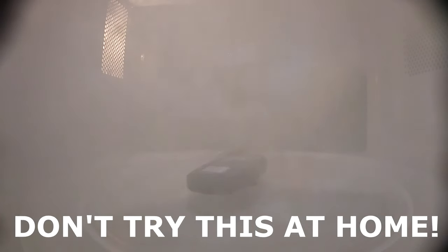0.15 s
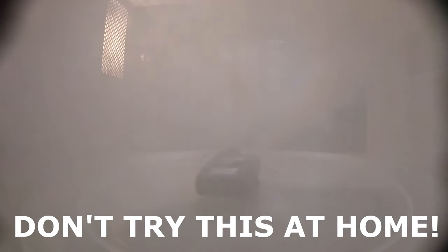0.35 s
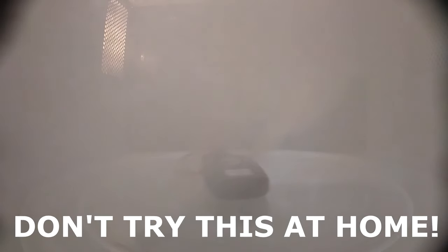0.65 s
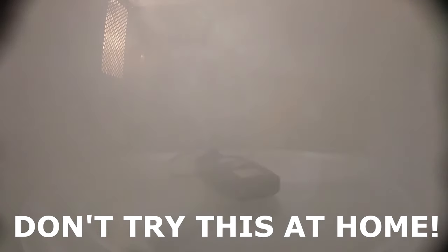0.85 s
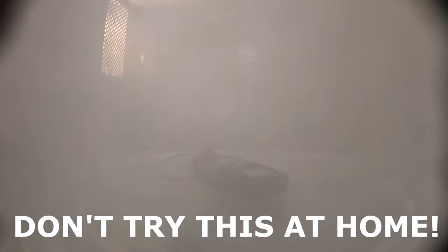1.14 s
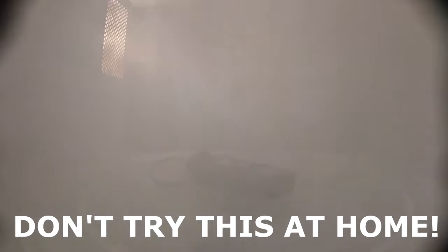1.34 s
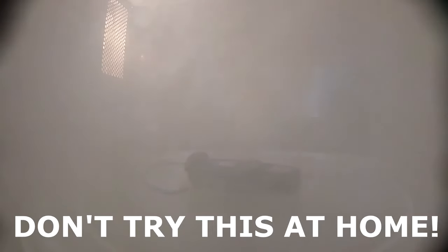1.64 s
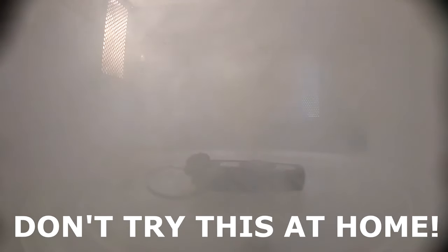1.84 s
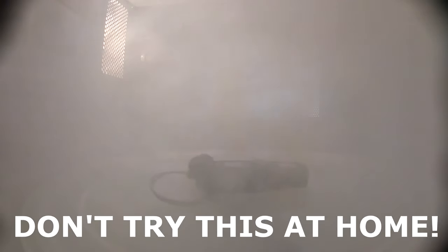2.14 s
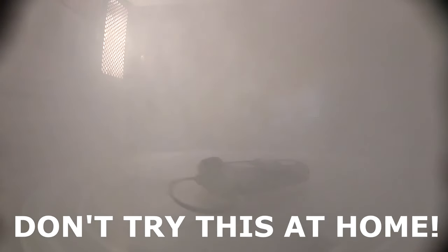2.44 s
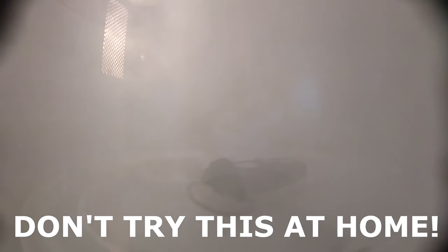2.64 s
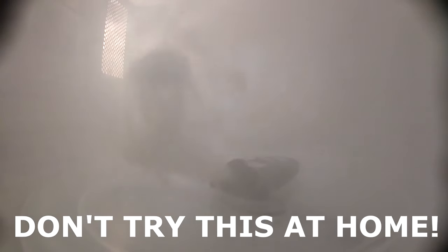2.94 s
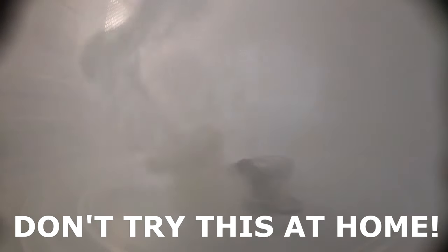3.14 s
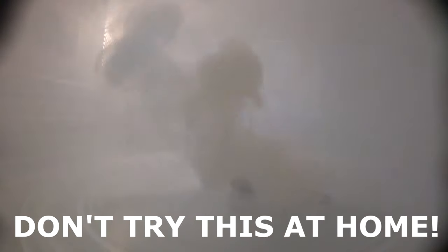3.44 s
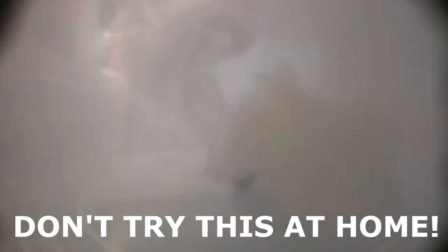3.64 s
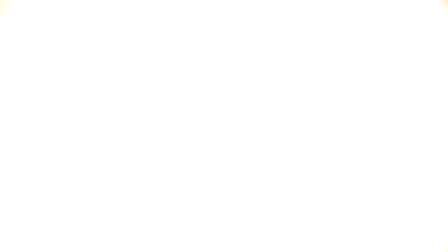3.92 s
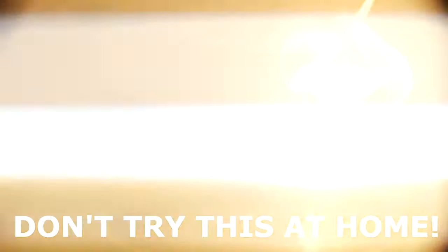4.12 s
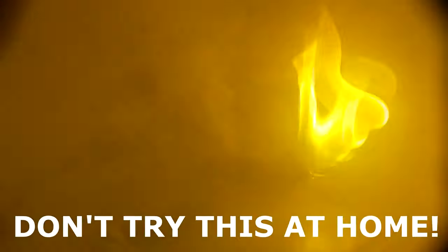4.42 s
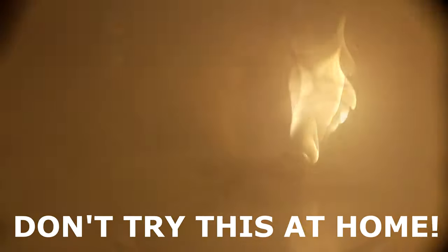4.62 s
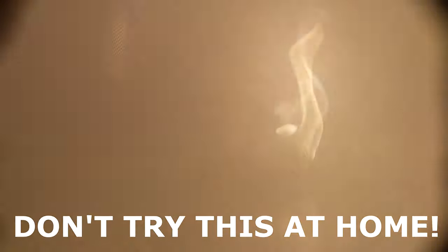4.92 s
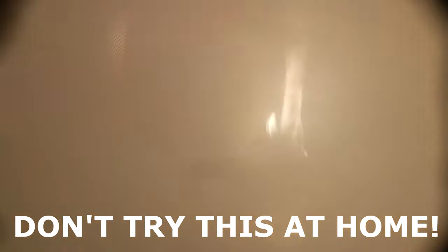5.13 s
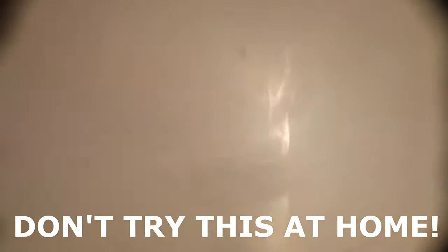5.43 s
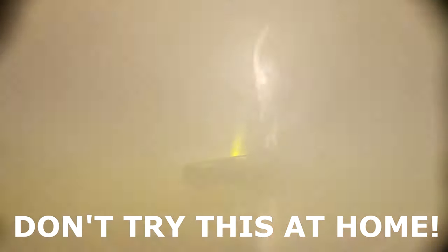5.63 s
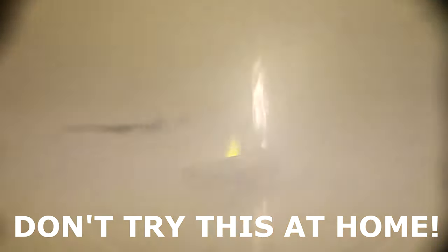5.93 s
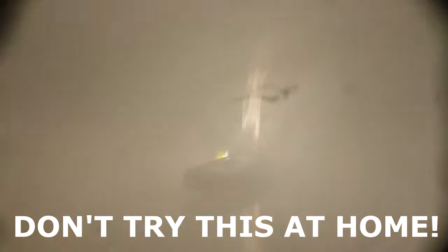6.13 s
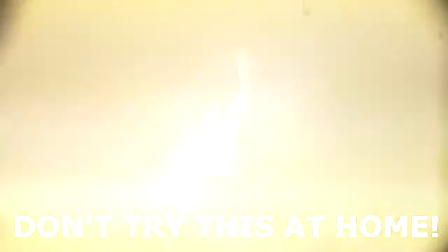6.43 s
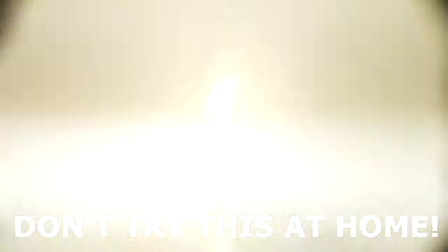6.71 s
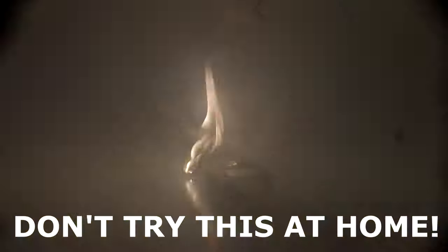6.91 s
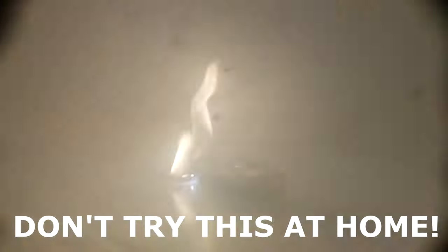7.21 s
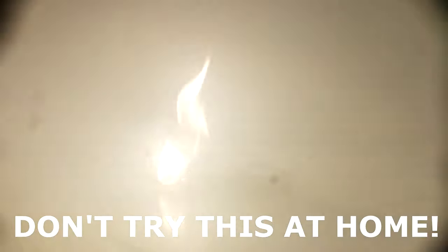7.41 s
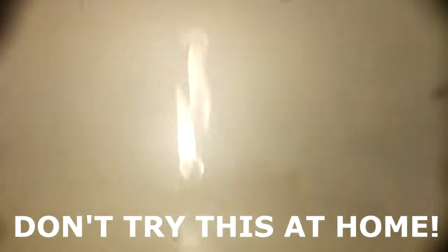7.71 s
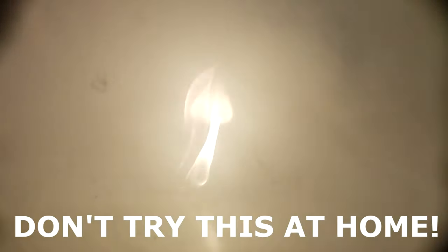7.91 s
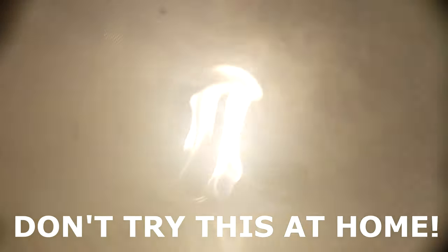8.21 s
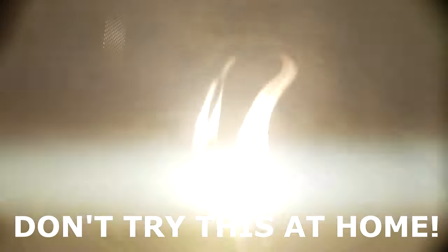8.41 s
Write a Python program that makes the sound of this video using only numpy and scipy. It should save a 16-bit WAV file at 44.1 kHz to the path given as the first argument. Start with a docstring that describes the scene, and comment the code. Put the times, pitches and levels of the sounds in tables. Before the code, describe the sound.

A microwave oven runs throughout: a steady low mains hum, wavering fan blade drone, soft rushing air and low rumble. For the first 3.8 seconds there are only faint dry ticks of hot plastic, with a clearer snap and tiny hiss near 2.6. At 3.85 the plastic ignites with a sudden thump and a loud, harsh low electric buzz, with bright spitting sizzle and whistling gas spurts until about 4.4; the hum and air dip slightly. Calm oven noise returns. Weak hiss begins around 5.1, then a raspy, ringing jet at 5.4 and rough buzzing until 6.1, with softer frying. Stronger buzzes come at 6.45 and 6.7, with a small puff, followed by a low flame flutter near 7. Faint ticks and a soft hiss at 7.6 precede a last, weaker buzz with light frying at 8.4. Everything is close, inside a small ringing steel box.

```python
"""Plastic burning in a microwave oven

Hot plastic ticks as filtered clicks, then ignites with a thump of decaying sines; an arc drones in mains
harmonics, gas spurts in bands of pulsing noise, and flare and melt sizzle as grains in a steel cavity.
Behind them the oven runs: a hum of mains harmonics, wavering blade tones and coloured noise for the air."""
import sys
import numpy as np
from scipy import signal
from scipy.fft import rfft, irfft, next_fast_len
from scipy.io import wavfile

SR = 44100
rng = np.random.default_rng(int(sys.argv[2]) if len(sys.argv) > 2 else 0)


def unload_wav(signal):
    """Save mono or channel-first audio to the path in sys.argv[1] as 16-bit WAV at rate SR, clipped to [-1, 1]."""
    wavfile.write(
        sys.argv[1],
        SR,
        np.round(np.clip(np.atleast_2d(signal).T, -1, 1) * 32767).astype(np.int16),
    )


N = 377496
TIME = np.arange(N) / SR
MAINS_HZ, FAN_HZ = 49.935, 43.312   # mains and fan shaft


# spells of the electric arc: start_s, hold_s, level_db
ARCS = [(3.84, 0.056, -23.5), (3.89, 0.29, -25.5), (4.28, 0.044, -26), (5.38, 0.14, -29), (5.6, 0.41, -28),
        (6.06, 0.081, -33.5), (6.45, .25, -24), (6.72, 0.2, -25), (8.37, 0.18, -32.5)]
# harmonics of its drone: mains_multiple, level_db
ARC_PARTIALS = [(1, -13), (3, 1.5), (4, -19.5), (5, -14.5), (6, -27), (7, -35), (8, -24.5), (10, -32),
                (14, -35.5)]
# cavity tones it keeps ringing: pitch_hz, level_db
ARC_RINGS = [(1298, -34), (1648, -40), (2597, -42), (3096, -42), (5243, -54), (6245, -53)]


def arc_strength(rise_s=0.03, fall_s=0.058):
    """The arc's gain as it strikes, burns and goes out."""
    return spells(ARCS, rise_s, fall_s)


def arc(strength, flicker_db=0.5, surge_db=0.5, partial_waver=0.27, ring_roughness=0.7, ring_flicker_hz=24):
    """Plasma drones at the mains rate and surges; once the flare is over it also rings the cavity roughly."""
    drone = 0
    for multiple, db in ARC_PARTIALS:
        waver = 1 + partial_waver * (multiple > 3) * drift(8.7)   # only the upper partials waver
        drone = drone + from_db(db) * tone(multiple * MAINS_HZ) * waver
    # surges follow at the beat of mains and rotor; one peaks at 3.87 s
    surge = np.cos(2 * np.pi * (MAINS_HZ - FAN_HZ) * (TIME - 3.87))
    unsteady = from_db(flicker_db * drift(14) + surge_db * surge)
    ring = sum(from_db(db) * tone(hz) * (1 + ring_roughness * drift(ring_flicker_hz)) for hz, db in ARC_RINGS)
    flare_over = TIME > 5
    return strength * (drone * unsteady + flare_over * ring)


# puffs of flame: start_s, relative level_db
PUFFS = [(3.853, 2.5), (4.351, -8), (6.156, -12.5), (6.705, -10)]
# swings of the enclosed air: pitch_hz, relative level_db, decay_s (time constant)
PUFF_MODES = [(32, -30, .04), (164.3, -9, 0.016), (223.4, -17.5, 0.043), (498, -19.5, 0.0081),
              (687, -22.5, 0.0082), (1010, -32.5, 0.011)]


def puffs(rise_s=0.0028):
    """Vapour catches fire and pushes on the enclosed air, which swings a few times."""
    out = 0
    for start, db in PUFFS:
        age = np.maximum(TIME - start, 0)
        swing = 0
        for hz, mode_db, decay in PUFF_MODES:
            dying = np.exp(-np.minimum(age / decay, 50))
            swing = swing + from_db(mode_db) * np.sin(2 * np.pi * hz * age) * dying
        out = out + from_db(db) * (1 - np.exp(-age / rise_s)) * swing
    return out


# flare after ignition: start_s, hold_s, relative level_db
FLARES = [(3.848, 0.49, -49.5), (4.05, 0.11, -48.5), (4.248, 0.1, -49)]
# spells of frying melt: start_s, hold_s, relative level_db
MELT = [(5.608, 0.045, -55), (5.66, 0.3, -62), (5.93, 0.45, -60), (6.335, 0.616, -59), (6.48, 0.13, -57),
        (6.95, 0.38, -65), (8.37, 0.17, -62.5)]
# sizzle of the flare and its droplets: pitch_hz, relative level_db
FLARE_COLOUR = [(700, 1.5), (1500, 0.5), (3000, 3), (4800, -3), (6500, -6), (8000, -10.5), (10500, -13.5),
                (12000, -25), (15500, -25)]
# sizzle of the melt: pitch_hz, relative level_db
MELT_COLOUR = [(800, 4.5), (1400, -2), (3000, -1), (4200, -7), (5200, -12), (6400, -14), (8200, -20.5),
               (10500, -24), (12000, -34), (15500, -42)]


def burning(flare_db=6.0, droplets_db=-12.0, melt_db=12.5, sputter_db=1.6):
    """A bright, spitting flare after ignition, later a softer frying of the melt that buzzes with the arc."""
    flare = from_db(flare_db) * sizzle(grains(900, 2.6), FLARE_COLOUR, throb_db=5.5)
    flare = flare + from_db(droplets_db) * droplets()
    flare = flare * from_db(sputter_db * drift(40))
    pores = buzzing(grains(2500, 1.0), share=0.5, memory=0.8)
    melt = from_db(melt_db) * sizzle(pores, MELT_COLOUR, throb_db=3.5)
    return spells(FLARES, rise_s=0.01, fall_s=0.038) * flare + spells(MELT, rise_s=0.01, fall_s=0.12) * melt


def sizzle(pores, colour, throb_db):
    """Bursting gas pores, strongest at each pulse of the magnetron."""
    pulsing = pores * from_db(throb_db * magnetron())
    return rms_one(cavity(coloured(pulsing, colour), direct=0.7))


def droplets(per_s=1200, cycles=5.4):
    """Tiny droplets flash off around each magnetron pulse, each ringing at one of 18 pitches."""
    pitches = np.geomspace(4200, 15000, 18)
    born = grains(per_s, 2.0) * np.maximum(magnetron(), 0) ** 2
    dealt = rng.integers(0, len(pitches), N)   # which pitch each droplet gets
    rings = sum(resonate(born * (dealt == k), hz, hz / cycles / 2) for k, hz in enumerate(pitches))
    return rms_one(cavity(coloured(rings, FLARE_COLOUR), direct=1.5))


# gas spurts, the narrow ones whistling: start_s, hold_s, relative level_db, centre_hz, width_octaves
SPURTS = [(2.6, .03, -60, 6400, .5), (2.68, 0.038, -54, 6200, .5), (3.843, 0.0069, -26.5, 1990, 0.84),
          (3.85, .024, -30.5, 1650, 1), (3.853, .03, -37, 3030, 0.2), (4.29, .004, -32, 2700, .3),
          (4.309, .014, -25, 2790, .13), (4.329, .012, -29.5, 2480, .25), (3.926, 0.46, -39.5, 720, .12),
          (4.241, .1, -46, 1470, 0.065), (4.33, 0.027, -49, 5700, .2), (4.348, 0.017, -35.5, 1480, .06),
          (5.127, .012, -49, 5500, 0.86), (5.208, 0.081, -50.5, 5300, 1), (5.266, .01, -51, 5300, 0.96),
          (5.365, 0.013, -31, 3320, 0.11), (5.366, 0.062, -30, 3200, 0.65), (5.373, 0.18, -32.5, 1940, 1),
          (5.376, 0.14, -45, 3680, 0.07), (5.455, 0.09, -28.5, 2830, 0.36), (5.468, 0.074, -43, 6300, 0.14),
          (5.39, 0.19, -39, 1300, 0.1), (5.428, 0.17, -34, 675, 0.14), (5.56, 0.27, -46, 2620, 0.06),
          (6.448, 0.23, -43, 2820, 0.36), (6.8, 0.13, -51.5, 3300, 0.41), (7.223, .015, -56, 4480, 0.45),
          (7.59, 0.13, -43, 2450, 0.43)]
# any jet heard through the door: pitch_hz, relative level_db
JET_COLOUR = [(500, -4), (730, 8), (950, -2), (1250, 0), (3500, -0.5), (5000, 0), (7000, 1.5), (10000, -3),
              (14000, -10.5)]


def spurts(level_db=-11.5, rise_s=0.0066, fall_s=0.0041, sputter_db=0.5, throb_db=1.0, skirt_db=36.0,
           burst_db=5, burst_widths=0.21, burst_s=0.011):
    """Gas jets rasp at the mains rate; each opens with a brighter burst that dies as the pressure drops."""
    out, bands = np.zeros(N), np.geomspace(100, 18000, 400)
    jet = coloured(buzzing(grains(9000, 0.72), share=0.5, memory=0.71), JET_COLOUR)
    jet = jet * from_db(sputter_db * drift(88) + throb_db * magnetron())

    def hump(widths_off):
        return np.transpose([bands, -skirt_db * np.log10(1 + widths_off ** 2 / 2)])

    for start, hold, db, hz, octaves in SPURTS:
        span = slice(int(start * SR), int(start * SR) + SR // 2)
        widths_off = np.log2(bands / hz) / octaves
        steady = rms_one(coloured(jet[span], hump(widths_off)))
        bright = rms_one(coloured(jet[span], hump(widths_off - burst_widths)))
        pressure = np.exp(-(TIME[span] - start) / burst_s)
        gas = (1 - pressure) * steady + pressure * from_db(burst_db) * bright
        out[span] += from_db(db) * held(start, hold, rise_s, fall_s)[span] * gas
    return from_db(level_db) * cavity(out, direct=0.86)


# louder droplets that flash off: start_s, relative level_db, pitch_hz
SPITS = [(3.953, -44, 9700), (3.973, -34, 6450), (4.013, -40, 6500), (4.051, -45, 7200), (4.068, -39, 9800),
         (4.092, -44, 6500), (4.112, -40, 3400), (4.131, -47, 9900), (4.173, -52, 10200),
         (4.194, -42, 2950), (4.251, -47, 9800), (4.292, -44, 7000), (4.332, -44.5, 9800),
         (5.374, -31.5, 7400), (5.398, -39, 9800), (5.416, -39, 7900), (5.438, -39, 9500),
         (5.537, -47, 6400), (5.652, -45, 6500)]


def spits(level_db=-8.5, swell_s=0.0021, width_hz=450, spray_db=-4.0):
    """Larger droplets burst in a short, pitched fizz with a broader spray around it."""
    out, age = np.zeros(N), TIME[:SR // 20]
    burst = age / swell_s * np.exp(1 - age / swell_s)   # peaks at swell_s
    for start, db, hz in SPITS:
        gas = rng.standard_normal(len(age))
        fizz = rms_one(resonate(gas, hz, width_hz))
        spray = from_db(spray_db) * rms_one(resonate(gas, hz, hz / 2))
        out[int(start * SR):][:len(age)] += from_db(db) * burst * (fizz + spray)
    return from_db(level_db) * cavity(out, direct=0.69)


# louder snaps of hot plastic: start_s, relative level_db, upper_edge_hz
SNAPS = [(0.8056, -58, 9500), (1.6811, -60.5, 9500), (2.029, -60, 9500), (2.4274, -58, 10000),
         (2.574, -58.5, 10000), (2.6182, -45.5, 15000), (6.3565, -56, 11000), (6.956, -53.5, 11000),
         (7.3158, -58, 10000)]
# tone of a snap: pitch_hz, relative level_db
SNAP_COLOUR = [(1000, -22), (3000, -1.5), (6500, -1), (8500, -6), (10500, -3.5), (12000, -15), (15500, -16)]


def snaps(level_db=28.5):
    """Single cracks of heated plastic, each lowpassed at its own edge, smeared by the steel walls."""
    clicks, impulse = np.zeros(N), signal.unit_impulse(SR // 100)
    for start, db, edge_hz in SNAPS:
        dull = signal.butter(6, edge_hz, fs=SR, output="sos")
        clicks[int(start * SR):][:len(impulse)] += from_db(db) * signal.sosfilt(dull, impulse)
    return from_db(level_db) * cavity(coloured(clicks, SNAP_COLOUR), direct=0.53)


# flapping flame: pitch_hz, relative level_db
FLUTTER_COLOUR = [(15, -5), (33, 2), (45, -12), (80, -12), (200, -6.5), (300, -27), (1000, -68),
                  (15000, -130)]


def flame(start_s=6.86, hold_s=0.11, level_db=-31, rise_s=0.057, fall_s=0.21):
    """The tall flame flaps once and stirs the air in the cavity: a swell of low noise."""
    flutter = rms_one(coloured(rng.standard_normal(N), FLUTTER_COLOUR))
    return from_db(level_db) * held(start_s, hold_s, rise_s, fall_s) * flutter


# ringing of the steel cavity: pitch_hz, width_hz, relative level_db, sharpening (share of pitch at full heat)
CAVITY_MODES = [(1298, 36, 5, .13), (1645, 35, -8, .11), (2200, 90, -7, .05), (2620, 70, -3, .08),
                (3040, 70, -5, .02), (3210, 50, -9, .02), (3550, 40, -7, .02), (3900, 45, -6, .02),
                (4320, 40, -9, .02), (5235, 60, -1, .025), (6230, 170, -1, .04)]
# heat of the gas in the cavity: time_s, heat (share of full)
HEAT = [(3.88, 0), (4.0, .9), (4.36, 1), (4.7, .4), (5.2, 0)]


def cavity_ring(x, level_db=-1.0):
    """Cavity modes colour all that burns inside; they go sharp while the flare heats the gas."""
    heat, = in_time(HEAT)
    out = x
    for hz, width, db, sharp in CAVITY_MODES:
        turn = np.exp(2j * np.pi * np.cumsum(hz * (1 + sharp * heat)) / SR)
        r = np.exp(-np.pi * width / SR)
        # shift the mode down to 0 Hz, smooth, and shift it back up
        smooth = signal.lfilter([1 - r], [1, -r], x * turn.conj() + 1e-18)
        out = out + 2 * from_db(db) * np.real(turn * smooth)
    return from_db(level_db) * out


def cavity(x, direct=0.4, t60_s=0.19, treble_t60_s=0.13, treble_from_hz=8000):
    """Steel walls: a dense, quickly dying flutter of echoes, duller as it dies."""
    t = TIME[:SR // 4]
    flutter = rng.standard_normal(len(t))
    body = signal.sosfiltfilt(signal.butter(2, treble_from_hz, fs=SR, output="sos"), flutter)
    treble = flutter - body
    echoes = body * from_db(-60 * t / t60_s) + treble * from_db(-60 * t / treble_t60_s)
    return direct * x + signal.oaconvolve(x, echoes / np.linalg.norm(echoes))[:N]


def magnetron(pulse_s=0.0096):
    """Power fed into the cavity, swinging from -1 to 1, with a peak pulse_s into each mains cycle."""
    return np.cos(2 * np.pi * MAINS_HZ * (TIME - pulse_s))


# transformer hum: mains_multiple, level_db
HUM = [(1, -41.5), (2, -19.5), (3, -39.5), (4, -41), (6, -45), (9, -53.5), (12, -52.5), (14, -58.5),
       (21, -60.5), (22, -64.5), (25, -64), (26, -61.5), (28, -64), (30, -62), (36, -64.5), (40, -63.5),
       (42, -67), (78, -74.5)]


def transformer(waver_db=0.5, wobble_db=-49.5):
    """Core and panels vibrate at multiples of the mains; the turning rotor beats against them."""
    hum = sum(from_db(db) * tone(multiple * MAINS_HZ) for multiple, db in HUM)
    return hum * from_db(waver_db * drift(7.7)) + from_db(wobble_db) * tone(2 * MAINS_HZ - FAN_HZ)


# four-bladed fan: shaft_multiple, level_db, unsteadiness (share)
FAN = [(1, -47.5, 0.12), (4, -28.5, 0.1), (12, -46, 0.49), (16, -51, 0.34)]


def fan(flutter_hz=4.9):
    """Blade tones waver in level and phase in the uneven inflow."""
    out = 0
    for multiple, db, unsteady in FAN:
        turn = np.exp(2j * np.pi * (multiple * FAN_HZ * TIME + rng.random()))
        inflow = np.sqrt(2) + unsteady * (drift(flutter_hz) + 1j * drift(flutter_hz))
        out = out + from_db(db) * np.real(turn * inflow)
    return out


def blade_octave(blade_db=-39.5, mains_db=-43, airy_db=-45, width_hz=34, waver_db=0.2, first_swell_s=0.22):
    """In a duct resonance the blade octave beats with the seventh mains harmonic, three swells a second."""
    blade_hz, mains_hz = 8 * FAN_HZ, 7 * MAINS_HZ
    pair = 0
    for hz, db in ((blade_hz, blade_db), (mains_hz, mains_db)):
        pair = pair + from_db(db) * np.sqrt(2) * np.cos(2 * np.pi * hz * (TIME - first_swell_s))
    airy = from_db(airy_db) * tone(blade_hz) * drift(width_hz / 2)
    return (pair + airy) * from_db(waver_db * drift(2.0))


# rush through the ducts: pitch_hz, relative level_db
AIR = [(440, -34), (750, -3.5), (952, -2.5), (1010, -4), (1220, -0.5), (1570, -3.5), (1690, -2.5),
       (2900, -7), (4500, -18), (5170, -26), (6080, -26), (7820, -38.5), (10700, -51), (15000, -81)]


def air_rush(rush_db=-42.5, chop=0.043, buzz=0.076):
    """The rush of air is lightly chopped by the blades and by the shaking panels."""
    pulsing = 1 + chop * tone(4 * FAN_HZ) + buzz * tone(2 * MAINS_HZ)
    return from_db(rush_db) * rms_one(coloured(rng.standard_normal(N) * pulsing, AIR))


# low rumble of the air: pitch_hz, relative level_db
AIR_LOW = [(15, -2.5), (28, -5.5), (38, -6), (65, 4.5), (92, 9), (125, 5.5), (260, -1), (420, -6.5),
           (640, -8), (800, -18), (1100, -46.5), (15000, -110)]
# air resonances of the oven: pitch_hz, width_hz, level_db
DUCT_MODES = [(78, 130, -49), (84.8, 1.3, -41.5), (167.6, 12, -41), (184.8, 28, -39), (226.3, 22, -47.5),
              (367, 34, -44), (501.3, 37, -43.5), (706, 39, -52.5)]


def duct_rumble(rumble_db=-36.0):
    """Turbulence booms in the low air resonances."""
    boom = 0
    for hz, width, db in DUCT_MODES:
        # two passes narrow the resonance, so each is made wider
        once = resonate(rng.standard_normal(N), hz, 1.45 * width)
        boom = boom + from_db(db) * rms_one(resonate(once, hz, 1.45 * width))
    return boom + from_db(rumble_db) * rms_one(coloured(rng.standard_normal(N), AIR_LOW))


def from_db(db):
    """Decibels to gain."""
    return 10 ** (np.asarray(db) / 20)


def rms_one(x):
    """Scale x to rms 1."""
    return x / np.sqrt(np.mean(x ** 2) + 1e-20)


def drift(rate):
    """Slow chance of spread 1 that changes about rate times a second."""
    hz = np.fft.rfftfreq(N, 1 / SR)[:2000]
    chance = rng.standard_normal(len(hz)) + 1j * rng.standard_normal(len(hz))
    return rms_one(irfft(chance / (1 + (hz / rate) ** 4), next_fast_len(N))[:N])


def coloured(x, points):
    """Filter x through a response drawn in points of pitch_hz, level_db."""
    size = next_fast_len(len(x) + 4096)
    hz, db = np.transpose(points)
    bins = np.fft.rfftfreq(size, 1 / SR) + 1e-3
    gain = from_db(np.interp(np.log(bins), np.log(hz), db))
    return irfft(rfft(x, size) * gain, size)[:len(x)]


def resonate(x, hz, width):
    """One resonance with gain 1 on top."""
    r = np.exp(-np.pi * width / SR)
    feedback = [1, -2 * r * np.cos(2 * np.pi * hz / SR), r * r]
    return signal.lfilter(np.array([1, 0, -1]) * (1 - r * r) / 2, feedback, x + 1e-18)


def tone(hz):
    """A sine of rms 1 with a random phase."""
    return np.sqrt(2) * np.sin(2 * np.pi * (hz * TIME + rng.random()))


def grains(per_s, spread_db):
    """Tiny bursts of random size at random moments."""
    sizes = from_db(spread_db * np.minimum(rng.exponential(1, N), 4)) * rng.choice([-1, 1], N)
    return rms_one(sizes * (rng.random(N) < per_s / SR))


def buzzing(x, share, memory):
    """A share of x strikes again in every mains cycle, in a pattern that changes slowly."""
    period = round(SR / MAINS_HZ)
    cycles = np.resize(x[::-1], (N // period + 1, period))   # one row per cycle
    repeated = signal.lfilter([1], [1, -memory], cycles, axis=0).ravel()[:N]
    return np.sqrt(1 - share) * x + np.sqrt(share) * rms_one(repeated)


def held(start_s, hold_s, rise_s, fall_s):
    """An envelope of height 1: attack, hold, release."""
    return np.interp(TIME, start_s + np.cumsum([0, rise_s, hold_s, fall_s]), [0, 1, 1, 0])


def spells(rows, rise_s, fall_s):
    """Gain of a source that sounds in spells of start_s, hold_s, level_db."""
    return np.max([from_db(db) * held(start, hold, rise_s, fall_s) for start, hold, db in rows], axis=0)


def in_time(rows):
    """Each column of a table that begins with time_s as a curve in time."""
    time_s, *columns = np.transpose(rows)
    return [np.interp(TIME, time_s, column) for column in columns]


# two tones that swell and fade: time_s, blade octave's relative level_db, eighth mains harmonic's level_db
TONE_LEVELS = [(0, 0, -41), (.7, -5, -50), (1.0, -1.5, -42), (1.9, -0.5, -46.5), (2.2, 4.5, -42.5),
               (2.7, -2.5, -46), (3.15, 3.5, -40), (3.4, -7, -46), (3.9, 2.5, -46), (4.2, -8, -44),
               (4.52, -7.5, -61), (4.8, 0.5, -48), (5.1, 3, -42.5), (5.55, -3, -43.5), (5.9, -0.5, -49),
               (6.17, 4, -39.5), (6.4, -3, -41.5), (6.85, -1, -43), (7.0, -8, -49), (7.2, -1.5, -43),
               (7.5, -5.5, -48.5), (8.1, 1.5, -44), (8.5, -8.5, -47)]


def scene(hum_sag_db=2.0, air_db=-1.5, air_sag_db=9.5, rumble_share=0.12, octave_share=0.35, recovery_s=0.45):
    """Burning plastic in the running oven; hum and blade tones dip under each arc, the air more slowly."""
    strength = arc_strength()
    load = strength / strength.max()
    keep = np.exp(-1 / (recovery_s * SR))
    sag_db = -air_sag_db * signal.lfilter([1 - keep], [1, -keep], load)   # lags behind the arc
    octave_db, eighth_db = in_time(TONE_LEVELS)
    fire = cavity_ring(burning() + spits() + spurts() + snaps())
    hum = from_db(-hum_sag_db * load) * (transformer() + fan())
    hum = hum + from_db(eighth_db) * tone(8 * MAINS_HZ)
    air = from_db(air_db + sag_db) * air_rush()
    air = air + from_db(rumble_share * sag_db) * duct_rumble()
    air = air + from_db(octave_db + octave_share * sag_db) * blade_octave()
    return (arc(strength) + puffs() + fire + flame() + hum + air)[None]


def record(dry, cutoff_hz=15700):
    """The top is cut steeply."""
    return signal.sosfilt(signal.ellip(10, 0.2, 80, cutoff_hz, fs=SR, output="sos"), dry)


dry = scene()
out = record(dry)
unload_wav(out)
```